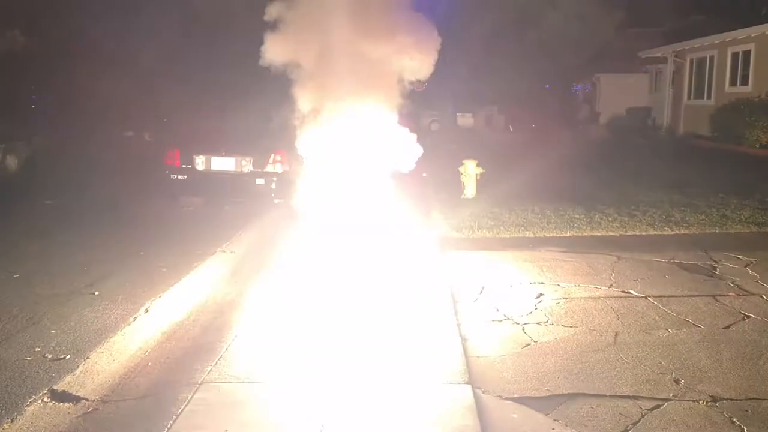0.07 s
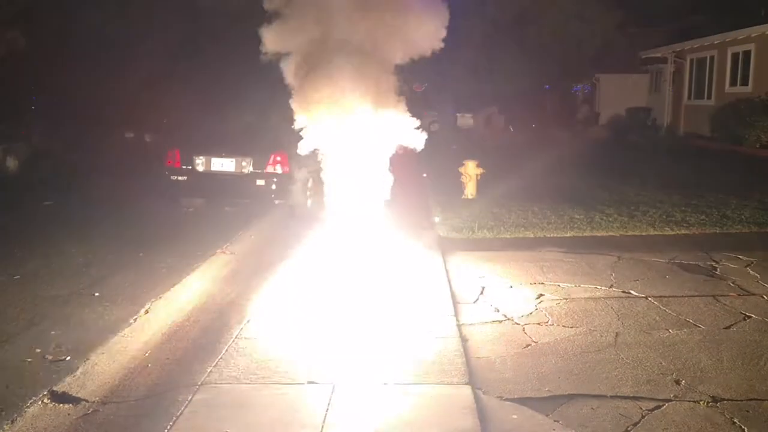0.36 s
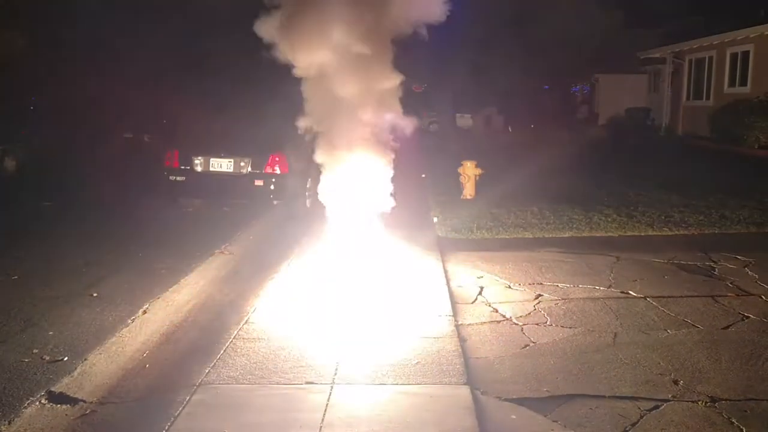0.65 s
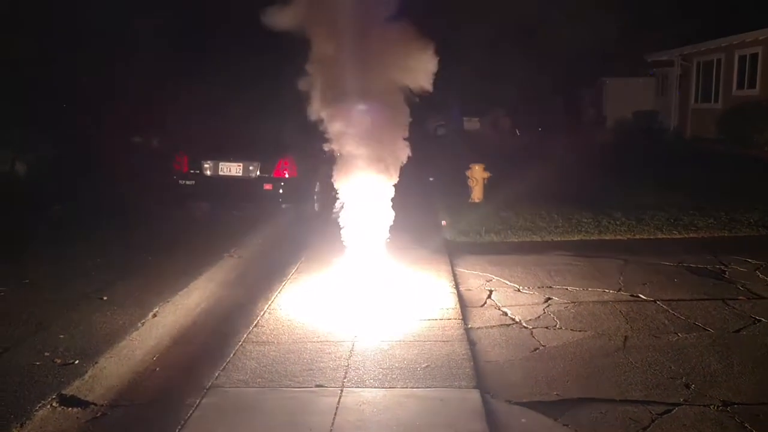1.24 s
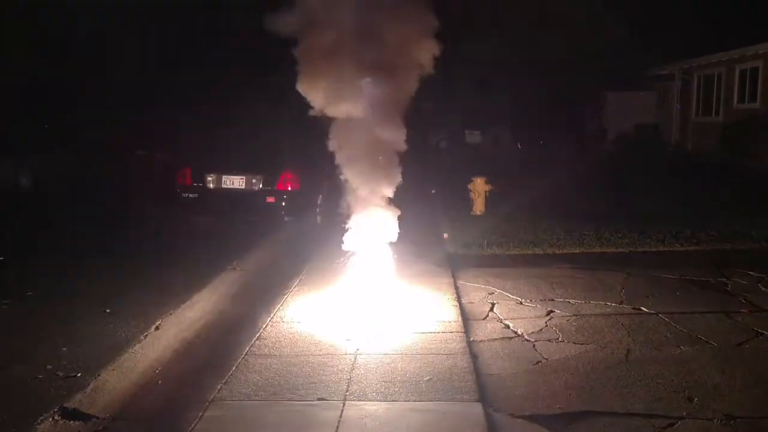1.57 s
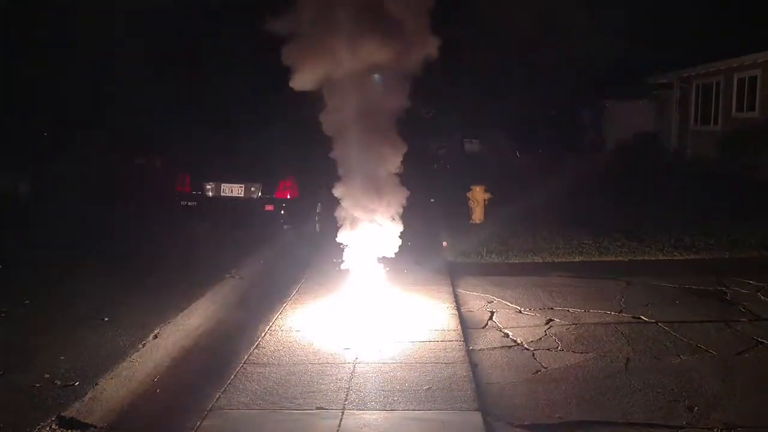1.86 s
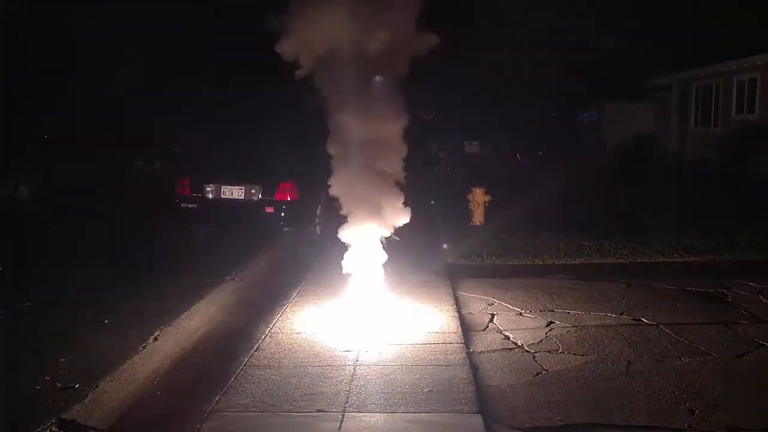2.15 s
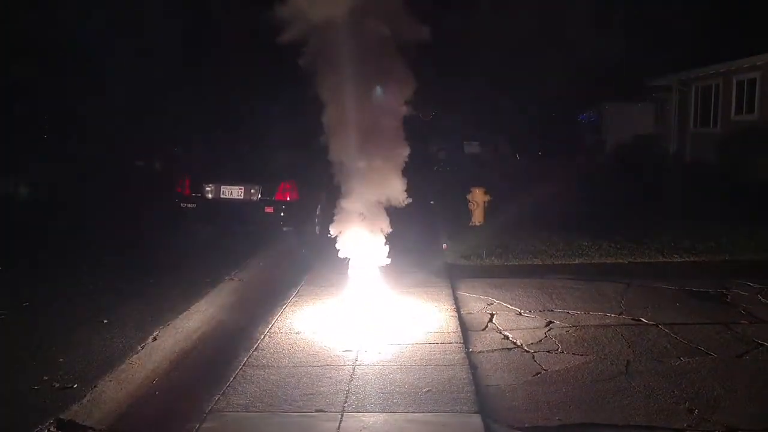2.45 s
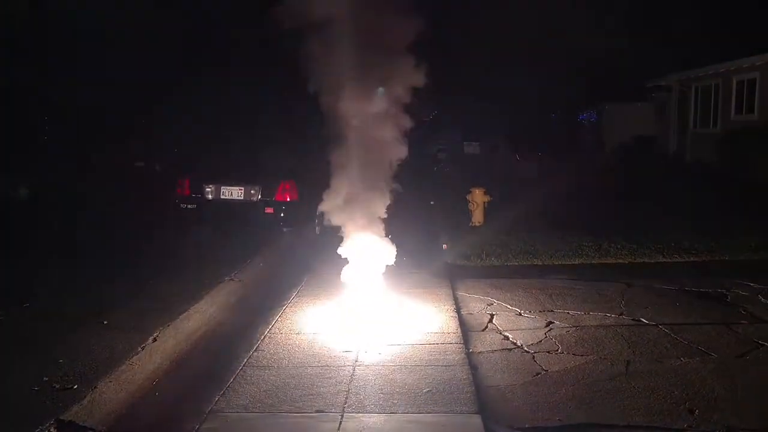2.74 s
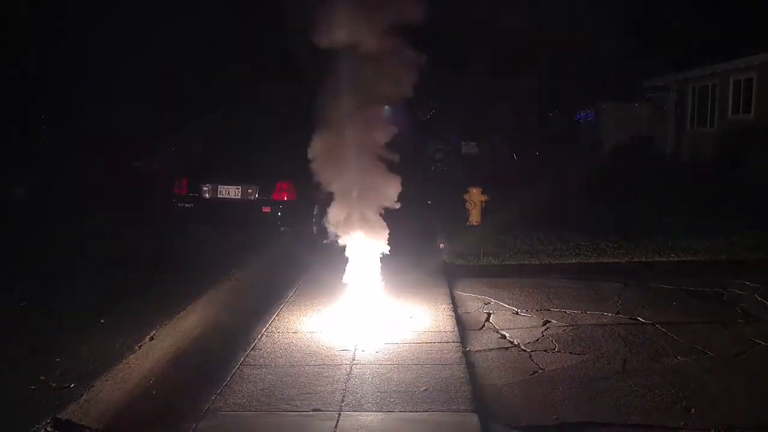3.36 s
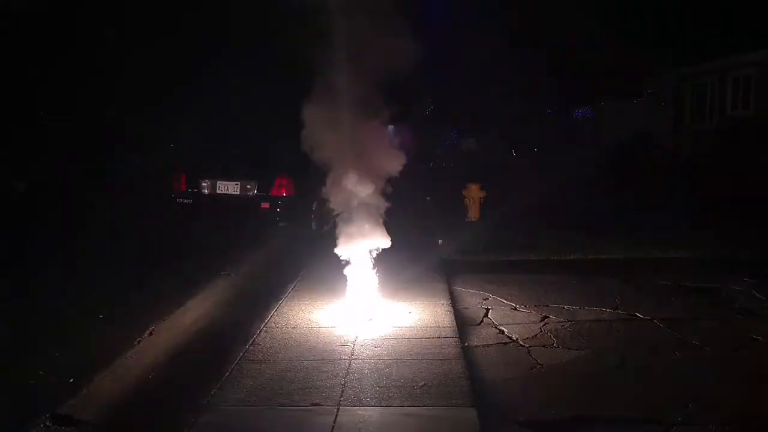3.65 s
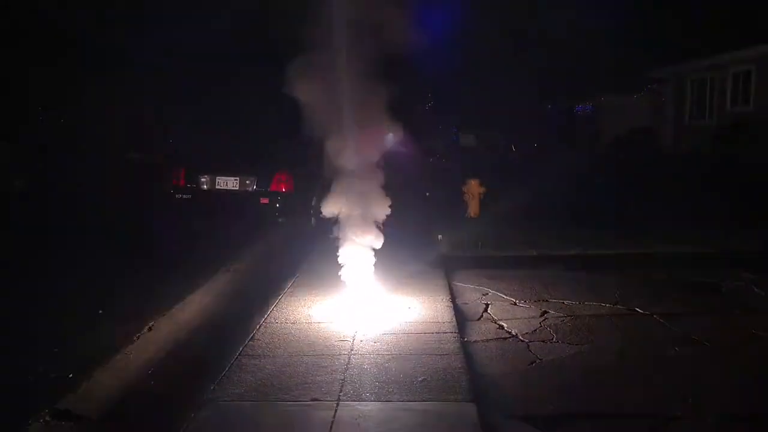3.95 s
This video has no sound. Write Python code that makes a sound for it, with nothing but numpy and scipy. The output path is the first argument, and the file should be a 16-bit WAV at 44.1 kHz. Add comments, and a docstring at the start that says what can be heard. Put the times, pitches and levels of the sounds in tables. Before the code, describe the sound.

A pile of burning powder hisses and sputters from the start, with fine crackling over a low, fluttering roar. Small dry pops are scattered throughout, clearer at about 0.1 and 0.4 seconds. The loudest cluster comes at 1.1 seconds with a spit of sparks, and the fire briefly dips. More pops stand out at 2.6 and 3.1 seconds. The hiss gradually weakens, still burning quietly at 4 seconds.

```python
"""A sputtering hiss over a low roar: a pile of powder burns on a pavement at night and slowly dies down.
The turbulent flame roars, escaping gas hisses, tiny grains crackle, and a few larger ones burst with
a dry pop and a spit of sparks. A hand-held camera hears it in stereo from a few metres away.
The louder pops make its gain control duck the whole fire, which then swells back."""
import sys
import numpy as np
from scipy import signal
from scipy.fft import rfft, irfft
from scipy.io import wavfile

SR = 44100
rng = np.random.default_rng(int(sys.argv[2]) if len(sys.argv) > 2 else 0)


def store_pcm(level_fs):
    """Save levels as 16-bit WAV."""
    pcm = np.round(np.clip(level_fs, -1, 1) * 32767).astype(np.int16)
    wavfile.write(sys.argv[1], SR, np.atleast_2d(pcm).T)


N = 176400

# colour of the escaping gas, rippled by the bounce off the pavement (frequency [Hz], level [dB per Hz])
HISS_SPECTRUM = [(1000, -49), (2300, -19), (2900, -8.5), (3450, -4.5), (3800, -7), (4500, -9.5),
                 (5300, -2.5), (5950, -1), (6850, -5), (7700, -0.5), (8200, 1.5), (9400, -5.5),
                 (10400, -2.5), (11200, -5.5), (12000, -11.5), (13400, -8), (15300, -11)]
# stereo image: how the left and right channels differ across frequency (frequency [Hz], left minus right [dB],
# coherence [0-1], left phase lead [rad])
STEREO_IMAGE = [(40, -11, 1, 3.5), (147, 1.1, .82, 0.97), (380, -1, 0.47, 0.3), (687, 1.6, .86, 0.23),
                (1180, -0.5, 1, 0), (1650, -2.3, 0.87, -.3), (1910, -4.5, 0, 0.9), (2160, 0, 1, -3),
                (2400, -1.5, 1, -3), (2776, 4.5, 0.02, -3), (2855, -1, 0.94, -1), (3850, 0, 1, 0),
                (4310, -5.5, 0.16, 0), (4450, -4, 0.76, 2.5), (5120, -1.2, 0.73, 1.44),
                (5980, -4.5, 0.76, 0.7), (6630, -9.5, 0.15, 1.5), (6880, -4, 0.7, 3), (7770, 2, 0.82, 1.5),
                (8650, -13, 0.6, 2), (9380, 1.3, 0.91, 4), (10350, -0.5, 0.79, 2), (11020, -5.7, 0.38, 2.5),
                (11750, .8, 1, 3), (13100, -1.5, .6, 4), (13700, -7.5, 0.5, 4), (15300, -0.5, 0.85, 3.5)]
# bursting grains (time [s], pop level [dB], spark level [dB])
GRAIN_BURSTS = [(.109, -7.5, -31), (.1346, -13, -40), (0.4156, -9.8, -33), (0.5822, -17, -40),
                (0.8366, -16, -36), (1.1022, -4, -19.5), (1.1272, -22, -24), (1.1328, -10, -22),
                (1.3109, -14, -36), (1.5712, -15.5, -36), (1.8733, -16, -38), (2.2015, -16.5, -38),
                (2.2467, -17.5, -40), (2.3051, -17, -38), (2.4142, -15, -36), (2.4992, -17, -40),
                (2.6068, -10, -32), (2.6384, -16, -36), (3.114, -5.5, -28), (3.2163, -18, -37),
                (3.4681, -19, -42), (3.4782, -21.5, -42), (3.6113, -19, -36), (3.8032, -26, -40)]

SWELL_S, FLICKER_S = 0.041, 0.007  # time scales of the fire's slow and fast flutter


def amp(db):
    """Decibels to gain."""
    return 10 ** (np.asarray(db) / 20)


def unit_rms(x):
    """Scales to an rms of one."""
    return x / np.sqrt(np.mean(x ** 2) + 1e-20)


def curve_at(table, hz, column=1):
    """One column of a table, interpolated over log frequency."""
    columns = np.transpose(table)
    return np.interp(np.log(hz + 1), np.log(columns[0] + 1), columns[column])


def blur(x, width, axis=0):
    """Gaussian smoothing over a width in steps, at an rms of one."""
    f = np.fft.rfftfreq(x.shape[axis])
    bell = np.exp(-2 * (np.pi * f * width / 2) ** 2)
    smooth = irfft(rfft(np.moveaxis(x, axis, -1)) * bell, x.shape[axis])
    return unit_rms(np.moveaxis(smooth, -1, axis))


def wander(seconds):
    """Random drift that changes over about this time."""
    return blur(rng.standard_normal(N), seconds * SR)


def burn_envelopes():
    """The burn surges and sinks: gain envelopes for the roar and the hiss."""
    # strength of the burn (time [s], roar level [dB], hiss level [dB])
    burn_levels = [(0, -38, -30.5), (.07, -38.5, -32), (.1, -40, -34), (.2, -38.5, -32.5), (.36, -40, -33),
                   (.55, -41.3, -35), (.72, -42.3, -35.5), (0.849, -39, -33.5), (1.08, -41.5, -33.5),
                   (1.2, -42, -36.5), (1.48, -43, -35), (1.63, -43, -40), (1.75, -42.5, -37),
                   (1.95, -41.5, -36), (2.3, -43.5, -38), (2.48, -42, -37), (2.68, -43.5, -39),
                   (2.85, -42.5, -40), (3.05, -43.5, -39.5), (3.2, -43.5, -41), (3.42, -45.5, -43),
                   (3.6, -44.5, -43), (3.7, -45.5, -45.5), (4, -45.3, -46.3)]
    times, roar_db, hiss_db = np.transpose(burn_levels)
    t = np.arange(N) / SR
    return amp(np.interp(t, times, roar_db)), amp(np.interp(t, times, hiss_db))


def channel_gains(hz):
    """Complex gain of the left and right channel for sound from the fire."""
    balance_db, lead_rad = curve_at(STEREO_IMAGE, hz), curve_at(STEREO_IMAGE, hz, column=3)
    left = amp(balance_db / 2) * np.exp(0.5j * lead_rad)
    pair = np.array([left, 1 / left])
    return pair / np.sqrt(np.mean(abs(pair) ** 2, axis=0))


def turbulence(spectrum, envelope, patch_db, brighten, pivot_hz, top_octaves, sway):
    """Churning stereo noise that tilts up by `brighten` dB per octave for each dB of the envelope."""
    size, hop = 1024, 256
    patch_s, patch_hz = 0.031, 250  # extent of the spectral patches that come and go
    hz, frames = np.fft.rfftfreq(size, 1 / SR), N // hop + 6
    a, b, c, d, patches = np.moveaxis(rng.standard_normal((frames, len(hz), 5)), -1, 0)
    patches = blur(blur(patches, patch_s * SR / hop), patch_hz / hz[1], axis=1)
    vigour_db = np.interp(np.arange(frames) * hop, np.arange(N), 20 * np.log10(unit_rms(envelope)))
    octaves = np.clip(np.log2((hz + 1) / pivot_hz), -2, top_octaves)
    tilt_db = brighten * vigour_db[:, None] * octaves
    # the colour slides in frequency by the share `sway` as the flame leaps and sinks
    drift = blur(rng.standard_normal(frames), 0.19 * SR / hop)
    hz = hz * np.exp(sway * drift)[:, None]
    coherence = np.clip(curve_at(STEREO_IMAGE, hz, column=2), 0, 1)
    left = a + 1j * b
    right = coherence * left + np.sqrt(1 - coherence ** 2) * (c + 1j * d)
    colour = amp(curve_at(spectrum, hz) + patch_db * patches + tilt_db)
    spectra = np.array([left, right]) * channel_gains(hz) * colour
    _, noise = signal.istft(spectra.transpose(0, 2, 1), nperseg=size, noverlap=size - hop)
    return unit_rms(noise[:, :N])


def snap(excitation, spectrum, size=2048):
    """Filters a signal through a short, coloured snap, as the two channels carry it."""
    hz = np.fft.rfftfreq(size, 1 / SR)
    log_gain = np.log(amp(curve_at(spectrum, hz)))
    mirrored = np.r_[log_gain, log_gain[-2:0:-1]]
    minimum_phase = np.exp(np.conj(signal.hilbert(mirrored)))[:len(hz)]
    shape = np.roll(irfft(minimum_phase * channel_gains(hz)), size // 2, axis=1)
    shape /= abs(shape).max()
    return signal.oaconvolve(excitation[None], shape, axes=1)[:, size // 2:][:, :N]


def flame_roar(envelope):
    """The low bed: the flame column billows and flutters."""
    # colour of the turbulent flame (frequency [Hz], level [dB per Hz])
    roar_spectrum = [(20, -43), (35, -42), (60, -25.5), (100, -3.5), (150, -3), (250, 0), (370, -6),
                     (520, .5), (1000, -2.5), (1250, -8), (1450, -5), (2000, -16), (3000, -23.5),
                     (6000, -70)]
    billow = amp(0.34 * wander(SWELL_S) + 0.32 * wander(FLICKER_S))
    flame = turbulence(roar_spectrum, envelope, patch_db=0.62,
                       brighten=0.12, pivot_hz=605, top_octaves=1, sway=0)
    return flame * billow * envelope


def grain_crackle(grains_per_s=1300, spread_db=4, cap_db=19.5):
    """Countless grains flash, most of them tiny, each with one click."""
    size_db = np.minimum(spread_db * rng.exponential(1, N), cap_db)
    polarity = rng.choice([-1, 1], N)
    flashes = rng.random(N) < grains_per_s / SR
    return unit_rms(snap(amp(size_db) * polarity * flashes, HISS_SPECTRUM))


def gas_hiss(envelope):
    """The bright layer: jets of escaping gas and crackling grains sputter together."""
    sputter = amp(0.95 * wander(SWELL_S) + 0.52 * wander(FLICKER_S))
    jets = turbulence(HISS_SPECTRUM, envelope, patch_db=1.63,
                      brighten=0.17, pivot_hz=6950, top_octaves=0.1, sway=0.012)
    return (amp(-0.2) * jets + amp(-8.5) * grain_crackle()) * sputter * envelope


def spark_spits(half_length_s=0.00057):
    """Each bursting grain throws out a brief fizz of sparks."""
    t = np.arange(N) / SR
    flares = sum(amp(spark_db) * np.exp(-((t - time_s) / half_length_s) ** 2)
                 for time_s, _, spark_db in GRAIN_BURSTS)
    return flares * unit_rms(snap(rng.standard_normal(N), HISS_SPECTRUM))


def burst_pulse(t, wiggle_hz=9500, wiggle_s=0.000052, push_s=0.00021):
    """One grain's burst: a sharp pressure wiggle and a small push of gas."""
    wiggle = np.cos(2 * np.pi * wiggle_hz * t) * np.exp(-(t / wiggle_s) ** 2)
    push = t / push_s * np.exp(-(t / push_s) ** 2)
    return wiggle + 0.1 * push


def grain_pops(left_db=-5.5, left_lead_s=0.000038, bounce_s=0.000422, bounce_gain=0.42):
    """Larger grains burst in under a millisecond, each followed by its bounce off the pavement."""
    half = 128  # samples either side of the burst
    t = np.arange(-half, half) / SR
    t = np.array([t + left_lead_s, t])
    pop = (burst_pulse(t) - bounce_gain * burst_pulse(t - bounce_s)) * amp([[left_db], [0]])
    triggers = np.zeros(N)
    for time_s, pop_db, _ in GRAIN_BURSTS:
        triggers[round(time_s * SR)] += amp(pop_db)
    return signal.oaconvolve(triggers[None], pop, axes=1)[:, half:][:, :N]


def scene():
    """The fire as it reaches the camera."""
    roar_envelope, hiss_envelope = burn_envelopes()
    return flame_roar(roar_envelope) + gas_hiss(hiss_envelope) + spark_spits() + grain_pops()


def gain_control(x, threshold_db=-14.5, slope=0.7, attack_s=0.003, release_db_per_s=14.5):
    """The camera ducks both channels quickly after a peak over the threshold and recovers slowly."""
    peak_db = 20 * np.log10(abs(x).max(0) + 1e-9)
    cut_db = slope * (peak_db - threshold_db)
    release_db = release_db_per_s * np.arange(N) / SR
    held_db = np.maximum(np.maximum.accumulate(cut_db + release_db) - release_db, 0)
    pole = np.exp(-1 / (attack_s * SR))
    duck_db = signal.lfilter([1 - pole], [1, -pole], held_db)
    return x * amp(-duck_db)


def record(dry):
    """The camera's chain: gain control, soft clipping, then a steep treble cut."""
    ceiling, cutoff_hz = amp(-1.5), 15650
    rounded = ceiling * np.tanh(gain_control(dry) / ceiling)
    low_pass = signal.firwin(401, cutoff_hz, window=("kaiser", 9), fs=SR)
    return signal.oaconvolve(rounded, low_pass[None], "same")


dry = scene()
out = record(dry)
store_pcm(out)
```